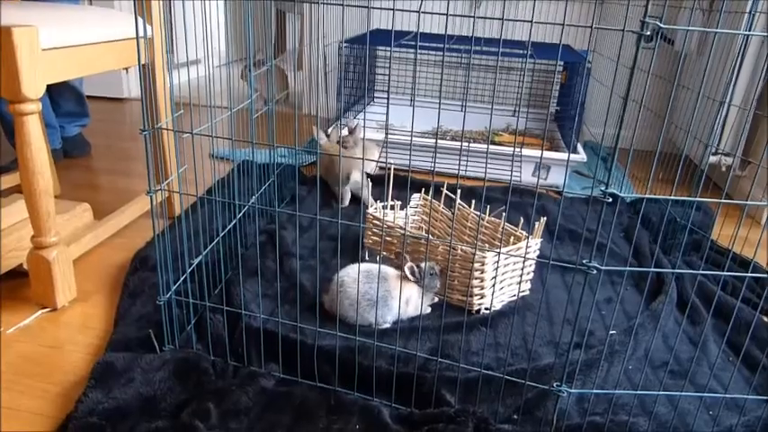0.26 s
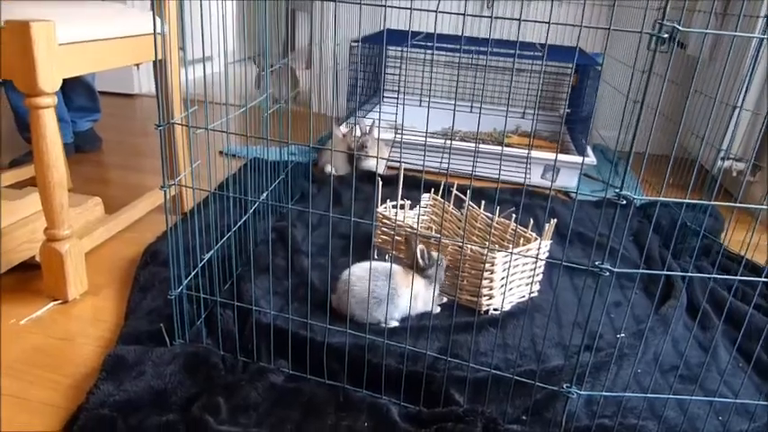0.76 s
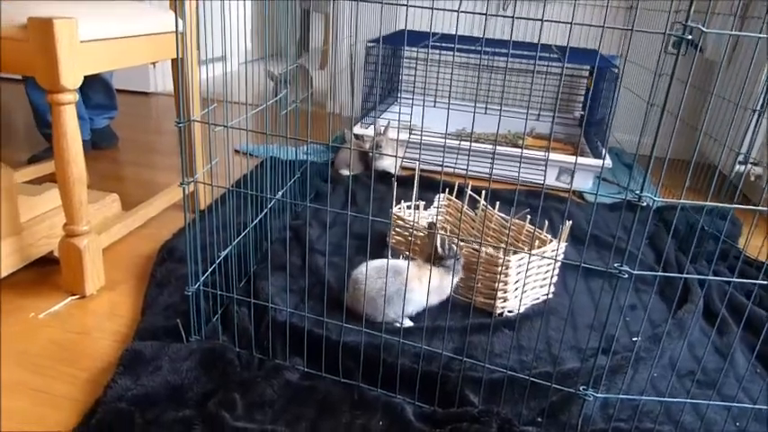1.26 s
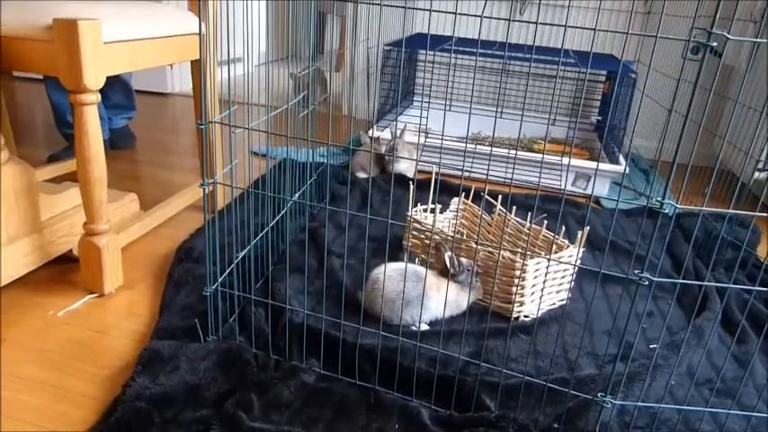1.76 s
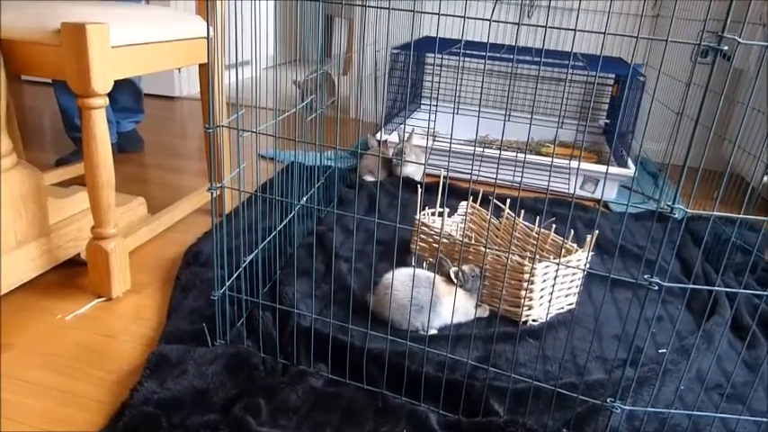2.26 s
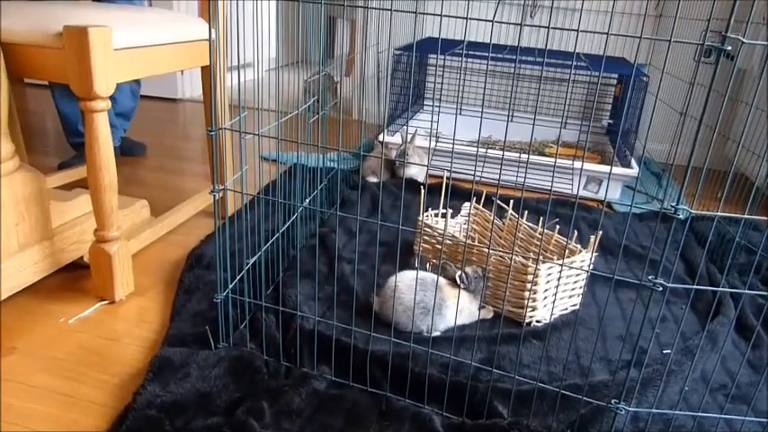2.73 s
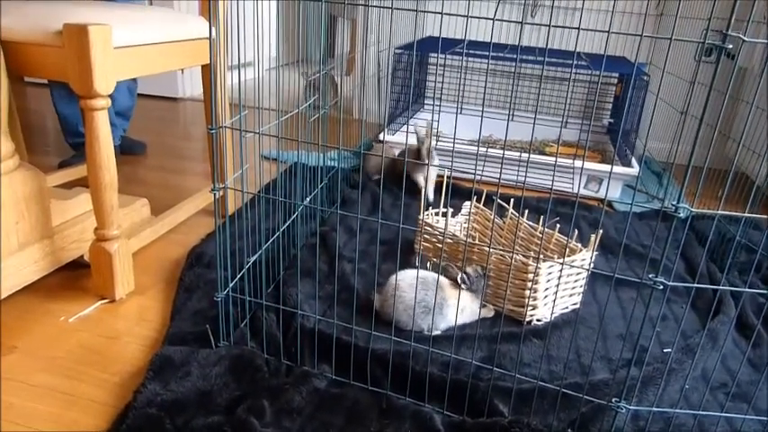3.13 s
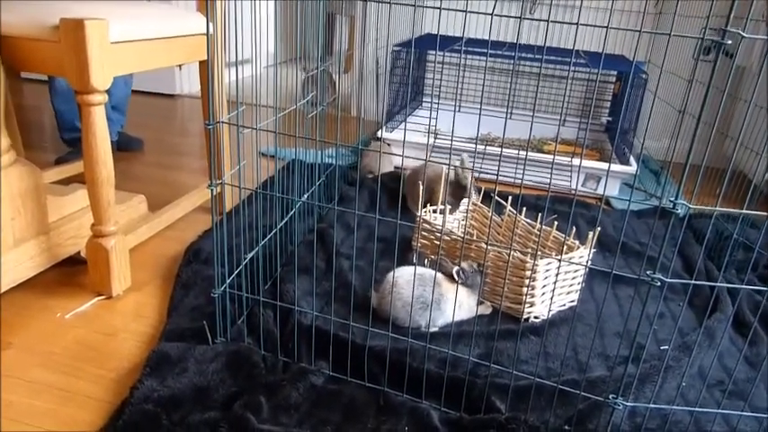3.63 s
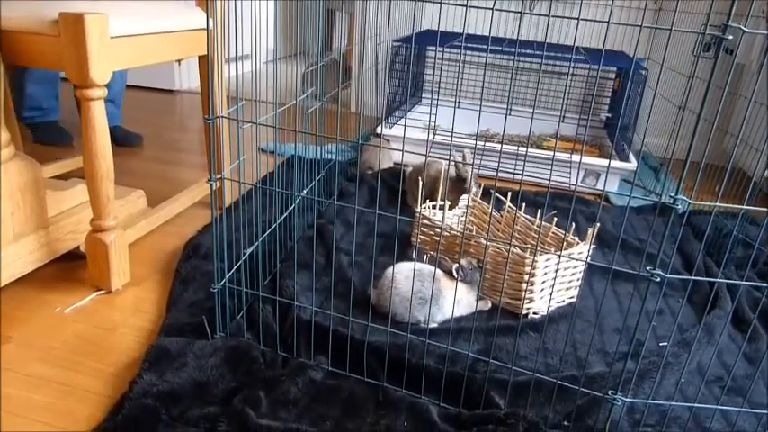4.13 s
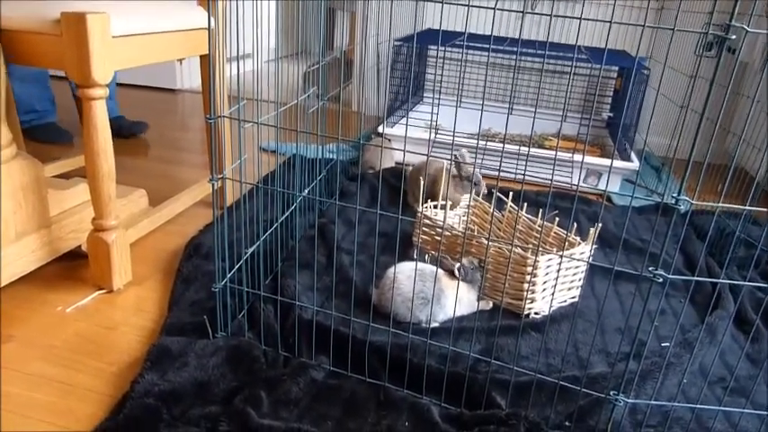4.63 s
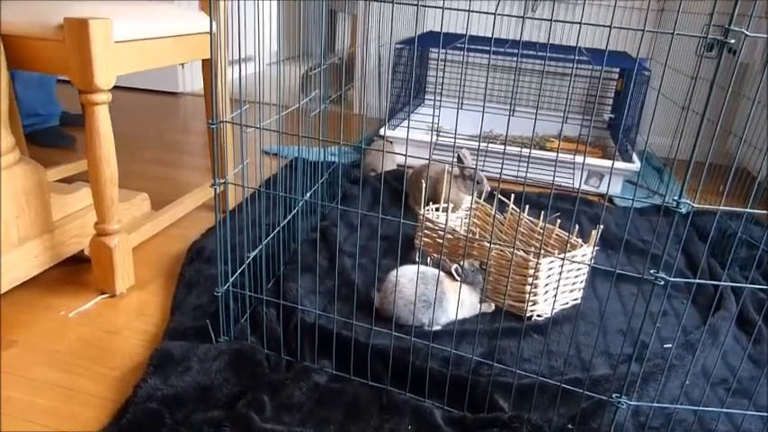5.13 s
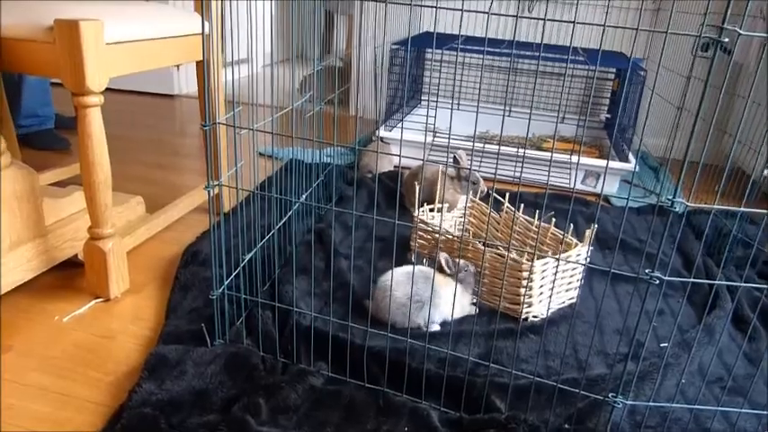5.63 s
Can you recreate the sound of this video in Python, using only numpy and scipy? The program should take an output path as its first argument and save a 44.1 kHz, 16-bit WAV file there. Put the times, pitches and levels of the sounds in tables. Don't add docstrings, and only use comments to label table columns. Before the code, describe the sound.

In a quiet hard-floored room, small rabbits work at a wicker basket. One lone twig click comes early, then a dry scrabbling flurry, then sparse ticks and soft rustles. Later, denser bites snap brightly, with a thump and rough scrape in the middle. Everything is heard from a few steps away, with short lively room reflections and a low, faint hush.

```python
import sys
import numpy as np
from scipy import signal
from scipy.io import wavfile
from scipy.ndimage import uniform_filter1d

SR = 44100
rng = np.random.default_rng(int(sys.argv[2]) if len(sys.argv) > 2 else 0)


def rack_gain(trim_db):
    fader = np.asarray(trim_db, float)
    return 10 ** (fader / 20)


def store_wav(level_fs):
    pcm = np.round(np.clip(np.atleast_2d(level_fs), -1, 1) * 32767)
    wavfile.write(sys.argv[1], SR, pcm.T.astype(np.int16))


N = 259308

BASKET_HZ, BASKET_T60 = 780, 0.052
LEAN = -0.052


def evened(x):
    return x / np.sqrt(np.mean(x ** 2) + 1e-20)


def read(points, hz):
    f, value = np.transpose(points)
    return np.interp(np.log(hz + 1), np.log(f + 1), value)


def follow(rows):
    return rack_gain(np.interp(np.arange(N) / SR, *np.transpose(rows)))


def add(mix, s, sound):
    part = mix[..., round(s * SR):][..., :sound.shape[-1]]
    part += sound[..., :part.shape[-1]]


def coloured(x, db_at):
    gain_db = np.maximum(db_at(abs(np.fft.fftfreq(2048, 1 / SR))), -100)
    log_gain = np.log(rack_gain(gain_db))
    taps = np.fft.ifft(np.exp(signal.hilbert(log_gain).conj())).real[:1024]
    return signal.oaconvolve(x, taps)[:len(x)]


def hump(hz, centre_hz, octaves):
    return np.exp(-.5 * (np.log2((hz + 1) / centre_hz) / octaves) ** 2)


def bell(hz, octaves):
    return lambda f: 20 * np.log10(hump(f, hz, octaves) + 1e-5)


# frequency in Hz, density in dB per Hz.
TWIG_SPECTRUM = [(710, -78), (1200, -12.5), (3200, -3), (4860, 6), (7410, 4.5), (10300, -1.4), (12700, -16),
                 (16000, -36)]
# delay in ms, level in dB, lean (side share).
EARLY_ECHOES = [
    (1.705, -3.5, -0.53),
    (4.08, -3.5, 0.13),
    (10, -14, -0.21),
    (10.86, -0.5, -0.094),
    (13.7, -5, -0.43),
    (19.6, -13, 0.14),
    (26, -30, -.2),
]


def snap(db, twig_hz, thick_db, ring_db, room_db):
    t = np.arange(4096) / SR
    click = signal.unit_impulse(len(t))
    sheen_db = 5.9 + 6.0 * np.log2(twig_hz / 6000)
    pitch_db = 4.4 * 6000 / twig_hz
    thick = bell(2070, 0.46)

    def thin(f):
        return read(TWIG_SPECTRUM, f) + pitch_db * hump(f, twig_hz, 0.11) + sheen_db * hump(f, 19700, 0.82)

    def strands(f):
        return 10 * np.log10(rack_gain(2 * thin(f)) + rack_gain(2 * (thick_db + thick(f))))

    bare = coloured(click, strands)
    bare = bare / abs(bare).max()
    onset = np.minimum(t / 0.0013, 1)
    ring = rack_gain(ring_db - 9.0) * np.sin(2 * np.pi * BASKET_HZ * t) * rack_gain(-60 * t / BASKET_T60) * onset
    heard = np.outer([1, LEAN], rack_gain(room_db) * ring)
    paths = [(0, 2.8, LEAN), *EARLY_ECHOES]
    for k, (ms, echo_db, lean) in enumerate(paths):
        reflected = k > 0
        late, loud = rng.standard_normal(2) * reflected
        rough = rng.standard_normal(400) * np.abs(rng.standard_normal(400))
        splinters = rough * (t ** 2 * np.exp(-t / 0.00032))[:400]
        path = signal.oaconvolve(bare, splinters)[:len(t)]
        path = rack_gain(echo_db + 0.86 * room_db * reflected + 2. * loud) * path / abs(path).max()
        add(heard, ms * (1 + 0.039 * late) / 1000, np.outer([1, lean], path))
    return rack_gain(db + room_db) * (bare + rack_gain(-21.0) * ring), rack_gain(db) * heard


# start in seconds, peak level in dB, twig pitch in Hz, room strength in dB.
BITES = [(0.4819, -26.5, 9200, -1.5), (2.2853, -35.5, 8500, 1.5), (2.5378, -48, 6695, 7.5),
         (2.764, -43, 5200, 5.5), (3.3761, -38, 5140, -2.5), (3.4784, -40.5, 8150, -3.5),
         (3.6859, -49, 4900, -10), (3.8463, -42, 7500, -1), (3.8648, -33.5, 5000, 1.5),
         (3.891, -19.5, 5800, -2.9), (4.0284, -28.5, 6760, 3.5), (4.145, -33, 5730, -1.5),
         (4.2084, -37, 4100, 4.5), (4.3805, -44.5, 4910, -1), (4.4991, -30, 5700, 7),
         (4.5721, -31, 7300, 7.5), (4.6865, -31, 4100, -10), (4.7444, -37, 5100, -13),
         (4.9311, -36.5, 7700, 8), (4.9713, -22.5, 8360, 4), (5.0125, -25.5, 8600, 0.5),
         (5.2415, -24.5, 4030, 3.5), (5.25, -20.5, 8100, 2), (5.4771, -37, 5500, 0), (5.748, -33, 5600, 0)]
# start in seconds, peak level in dB, twig pitch in Hz,
# room strength in dB.
SCRABBLES = [(0.9655, -42.5, 4400, 5), (0.985, -39, 7560, 3.5), (1.032, -37.5, 8500, 1),
             (1.04, -36, 8200, 6), (1.1261, -34.5, 7600, 2), (1.1747, -37.5, 5950, 6),
             (1.1812, -33, 4500, -3.5), (1.2105, -46.5, 4900, 10), (1.2385, -38, 7200, 3.5),
             (1.2766, -37, 4740, 1), (1.288, -37, 7050, -11), (1.3388, -32.5, 6160, -1),
             (1.3763, -27.5, 4730, 0.5), (1.469, -25.5, 7600, 0.8), (1.4773, -35, 9500, 5),
             (1.5199, -29, 7600, 5), (1.656, -33.5, 5700, 3.5), (1.7062, -40.5, 3605, 7.7),
             (1.7523, -36.5, 3970, 3)]
BITE_THICK_DB, BITE_RING_DB = -6.5, -9.5
SCRABBLE_THICK_DB, SCRABBLE_RING_DB = -14.5, -19.5
USUAL_DB, BODY_LOSS = -28.5, 0.24


def snaps():
    kinds = [(SCRABBLES, SCRABBLE_THICK_DB, SCRABBLE_RING_DB), (BITES, BITE_THICK_DB, BITE_RING_DB)]
    for rows, thick_db, ring_db in kinds:
        for s, db, hz, room_db in rows:
            less_db = BODY_LOSS * (db - USUAL_DB)
            yield s, snap(db, hz, thick_db - less_db, ring_db - less_db, room_db)


def crackle(count):
    size = rack_gain(2.6 * np.minimum(rng.exponential(1, count), 5)) * rng.choice([-1., 1.], count)
    return size * (rng.random(count) < 2500 / SR)


def swipe(s, db, swell_ms, fade_ms, hz, octaves):
    ms = (np.arange(16384) - 8192) * 1000 / SR
    shape = np.where(ms < 0, np.exp(-(ms / swell_ms) ** 2), np.exp(-abs(ms) / fade_ms))
    weave = bell(hz, octaves)

    def colour(f):
        return weave(f) + .5 * np.minimum(read(TWIG_SPECTRUM, np.maximum(f, 4000)), 0)

    fibres = coloured(crackle(len(ms)), colour)
    return s + ms[0] / 1000, rack_gain(db) * shape * evened(fibres)


# time in seconds, level in dB.
RUBBING_LEVEL = [(0.0, -64.5), (1.01, -60.5), (1.15, -44.5), (1.36, -43.5), (1.6, -51), (1.8, -65),
                 (2.16, -62), (2.8, -56), (3.06, -55.5), (3.73, -57.5), (3.9, -52), (4.49, -49.5),
                 (4.63, -35.5), (4.93, -53.5), (5.17, -48.5), (5.42, -50.5), (5.53, -57), (5.75, -52.5)]
# peak time in seconds, level in dB, swell in ms, centre in Hz,
# width in octaves.
SWIPES = [(.40, -57.5, 20, 7000, 0.65), (1.709, -61, 2.7, 3480, 0.078), (1.756, -51.5, 3.3, 3860, 0.12),
          (2.086, -55, 10, 6850, 0.38), (2.262, -47, 14, 6070, 0.77), (2.305, -54, 18, 8640, 0.19),
          (2.309, -57, 15., 9300, 0.08), (2.59, -54.5, 54, 5400, 1.43), (2.781, -55, 32, 5160, 1.3),
          (2.989, -55, 66, 2450, 2.8), (3.03, -51, 24, 7740, 0.32), (3.3, -58, 21, 6700, 0.85),
          (3.6, -68.5, 55, 2500, 1.6), (4.47, -38.5, 8.6, 850, 0.97), (4.529, -44, 33, 1500, 1.5),
          (4.582, -32.5, 14, 4630, 0.88), (4.61, -45.5, 27, 4860, 0.68), (5.483, -48, 16, 7650, 0.58)]
# peak time in seconds, level in dB, swell in ms.
LEANS = [
    (.19, -78, 49),
    (.79, -71, 40),
    (.875, -67.5, 32),
    (2.1, -75, 25),
    (3.64, -68.5, 69),
]
# peak time in seconds, level in dB, centre in Hz.
TICKS = [
    (2.082, -48.5, 6200),
    (5.024, -34, 7500),
    (5.232, -43, 5450),
    (5.466, -48.5, 6500),
]
FADE_MS, FADE_SHARE = 8., .3
HUM_OCTAVES = .04
TICK_SWELL_MS, TICK_FADE_MS, TICK_OCTAVES = 0.78, 1.4, 1


def rubbing():
    steady = evened(coloured(crackle(N), lambda f: read(TWIG_SPECTRUM, f)))
    out = rack_gain(-12.0) * follow(RUBBING_LEVEL) * steady
    for s, db, swell_ms, hz, octaves in SWIPES:
        add(out, *swipe(s, db, swell_ms, FADE_MS + FADE_SHARE * swell_ms, hz, octaves))
    for s, db, swell_ms in LEANS:
        add(out, *swipe(s, db, swell_ms, FADE_MS, BASKET_HZ, HUM_OCTAVES))
    for s, db, hz in TICKS:
        add(out, *swipe(s, db, TICK_SWELL_MS, TICK_FADE_MS, hz, TICK_OCTAVES))
    return out


BOOM_HZ, BOOM_DB_PER_OCTAVE = 182, -1.5


def knock(db, hz, octaves, ms, floor_db):
    t = np.arange(4096) / SR
    scrape = 0.11 * rng.standard_normal(len(t)) * np.exp(-1000 * t / ms)
    push = signal.unit_impulse(len(t)) + scrape
    boom_db = floor_db + BOOM_DB_PER_OCTAVE * np.log2(hz / 400)

    def response(f):
        boards = hump(f, hz, .5 * octaves) + 0.22 * hump(f, 2 * hz, 0.78)
        boom = rack_gain(boom_db + 2.0) * hump(f, BOOM_HZ, 0.51)
        rumble_cut = f ** 4 / (f ** 4 + 108.0 ** 4)
        return 20 * np.log10((boards + boom) * rumble_cut + 1e-5)

    sound = coloured(push, response)
    return rack_gain(db) * sound / abs(sound).max()


# start in seconds, level in dB, centre in Hz, width in octaves,
# contact in ms.
KNOCKS = [
    (2.585, -59, 600, 1.8, 9.5),
    (4.030, -37, 800, 1.02, 5.5),
    (4.036, -48.5, 406, 0.81, 5.),
    (4.028, -37, 3500, 0.83, 2.7),
    (4.527, -49.5, 297, 1.3, 34),
    (4.574, -31.5, 604, 1.53, 14.2),
    (4.586, -35.5, 1035, 0.85, 15.3),
    (5.243, -41.5, 2970, 0.5, 5.9),
    (5.25, -48.5, 970, 1, 3.8),
    (5.353, -57, 510, 0.39, 5.4),
]
# start in seconds, level in dB, centre in Hz, width in octaves,
# contact in ms.
STEPS = [
    (0.046, -77, 230, 0.46, 5.1),
    (0.481, -66.5, 353, 2, 2.1),
    (.79, -64.5, 264, 3.54, 9.1),
    (3.008, -41, 345, 0.95, 3.59),
    (4.396, -42, 780, 1.56, 6),
    (5.725, -59, 514, 2, 2.7),
]
STEP_BOOM_DB, KNOCK_BOOM_DB = 0, -16


def blows():
    steps = [(*row, STEP_BOOM_DB) for row in STEPS]
    knocks = [(*row, KNOCK_BOOM_DB) for row in KNOCKS]
    for s, *row in steps + knocks:
        yield s, knock(*row)


# frequency in Hz, 60 dB decay in seconds.
ROOM_T60 = [(150, 0.89), (400, 0.42), (1040, 0.49), (2760, 0.46), (7280, 0.34), (14000, 0.21)]
# frequency in Hz, side level relative to mid in dB.
ROOM_WIDTH = [(100, -21), (400, -5), (1400, -5), (3100, -9.5), (6800, -8), (15000, -0.5)]


def room(x):
    hz, t, z = signal.stft(rng.standard_normal((2, SR)), SR, nperseg=256)
    z = z * rack_gain(-60 * t / read(ROOM_T60, hz)[:, None])
    z[1] *= rack_gain(read(ROOM_WIDTH, hz))[:, None]
    build_up = np.minimum(np.arange(SR) / SR / 0.0078, 1)
    tail = signal.istft(z, SR, nperseg=256)[1][:, :SR] * build_up
    return signal.fftconvolve(x[None], tail / np.linalg.norm(tail[0]), axes=1)[:, :N]


def hiss(points, patchy_db):
    frames, hz = N // 256 + 5, np.fft.rfftfreq(1024, 1 / SR)
    a, b, patches = rng.standard_normal((frames, 513, 3)).T
    patches = uniform_filter1d(patches, size=12, axis=0)
    patches = evened(uniform_filter1d(patches, size=14, axis=1))
    z = (a + 1j * b) * rack_gain(read(points, hz)[:, None] + patchy_db * patches)
    return evened(signal.istft(z, nperseg=1024, noverlap=768)[1][:N])


# time in seconds, level in dB.
MURMUR_LEVEL = [(0, -67.5), (.25, -73), (.85, -71.5), (2.3, -73), (2.65, -67.5), (3.4, -73), (3.6, -69.5),
                (5., -63), (5.88, -74.5)]
# frequency in Hz, density in dB per Hz.
HOUSE_SPECTRUM = [(60, -48), (130, -4), (250, -11), (500, 0.5), (780, -2), (1200, -5.5), (2500, -27)]


def murmur():
    mid = rack_gain(2.5) * hiss(HOUSE_SPECTRUM, 2.2)
    side = rack_gain(-3.0) * hiss(HOUSE_SPECTRUM, 2.6)
    return follow(MURMUR_LEVEL) * np.array([mid, side])


# frequency in Hz, density in dB per Hz.
AIR_MID_SPECTRUM = [(12, -21), (20, -8), (290, -2.5), (521, -21.5), (616, -14.5), (935, -12.5),
                    (1730, -10.5), (2160, -14), (7150, -26.5), (15600, -26)]
# frequency in Hz, density in dB per Hz.
AIR_SIDE_SPECTRUM = [(12, -43), (20, -24), (133, -14.5), (176, -8.5), (334, -3), (860, -6), (935, -8),
                     (1110, -9.5), (2100, -16.5), (15600, -38)]


def air():
    return np.array([rack_gain(-67.5) * hiss(AIR_MID_SPECTRUM, 0.99), rack_gain(-61) * hiss(AIR_SIDE_SPECTRUM, 0.99)])


def scene():
    near, twigs, boards = np.zeros((2, N)), np.zeros((3, N)), np.zeros((3, N))
    for k, (s, (bare, heard)) in enumerate(snaps()):
        add(near, s, heard)
        add(twigs[k % 3], s, rack_gain(9.5) * bare)
    for k, (s, blow) in enumerate(blows()):
        add(boards[k % 3], s, blow)
    fur = rubbing()
    twigs[0] += rack_gain(1.0) * fur
    near += np.outer([1, LEAN], fur + rack_gain(10.0) * boards.sum(0))
    tails = sum(room(x) for x in twigs + rack_gain(14.0) * boards)
    mid, side = near + tails + murmur() + air()
    return np.array([mid + side, mid - side])


def roll_off(x):
    return signal.sosfilt(signal.butter(12, 16510, fs=SR, output="sos"), x)


def record(dry):
    limited = signal.oaconvolve(dry, signal.firwin(511, 15750, fs=SR)[None], "same")
    return roll_off(limited)


dry = scene()
out = record(dry)
store_wav(out)
```